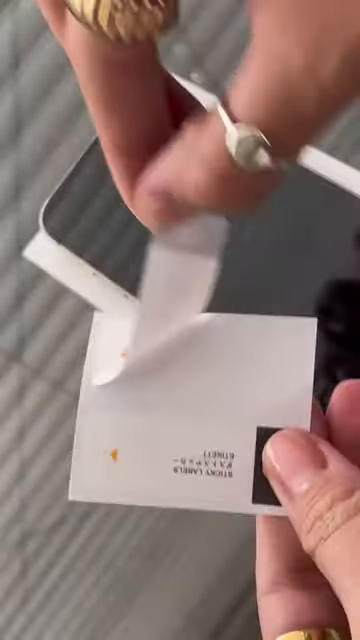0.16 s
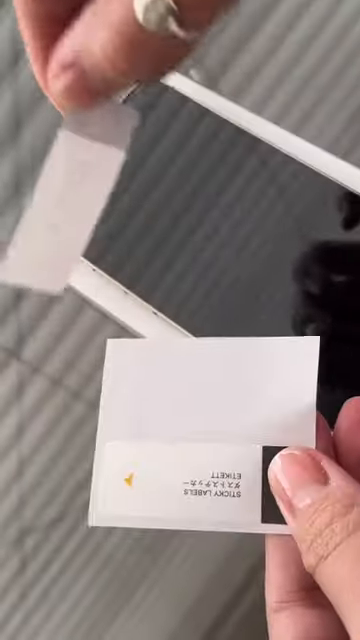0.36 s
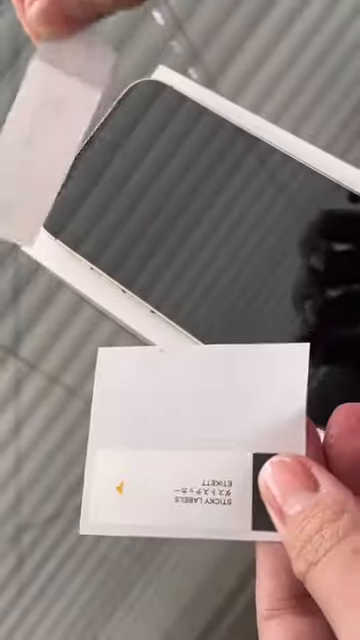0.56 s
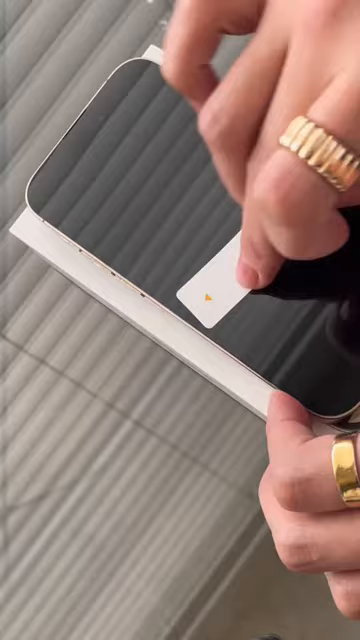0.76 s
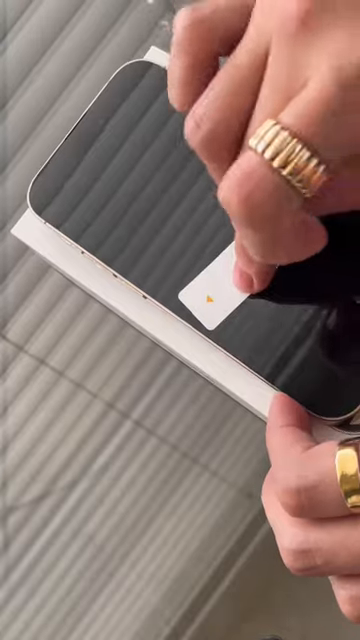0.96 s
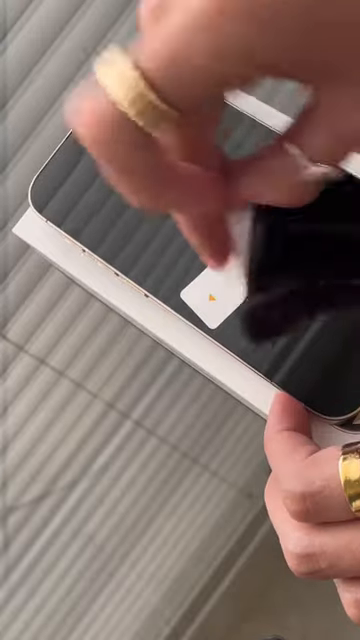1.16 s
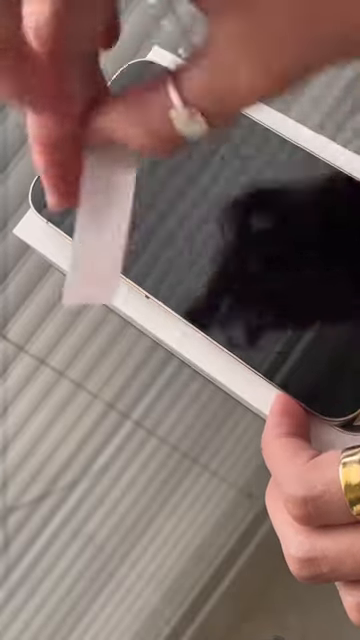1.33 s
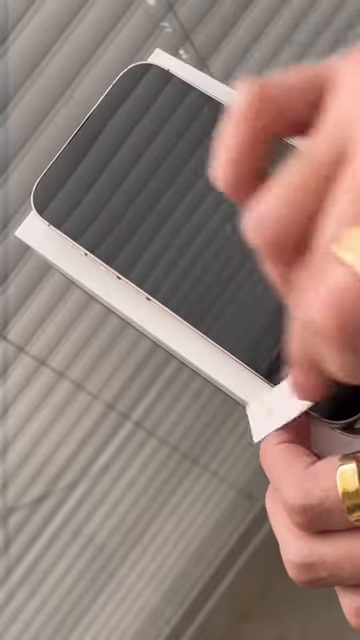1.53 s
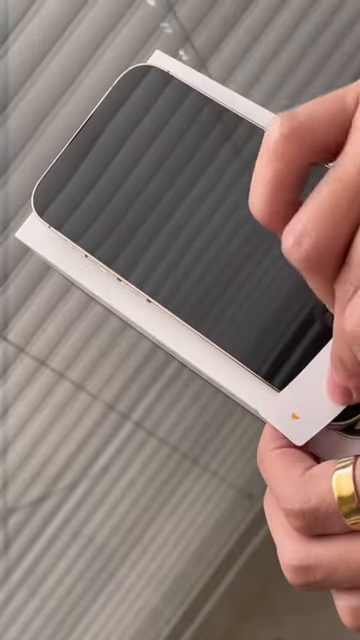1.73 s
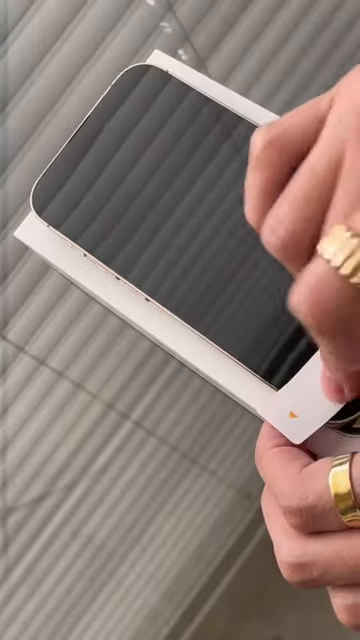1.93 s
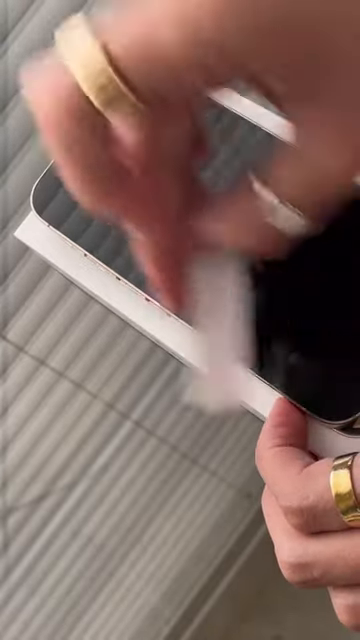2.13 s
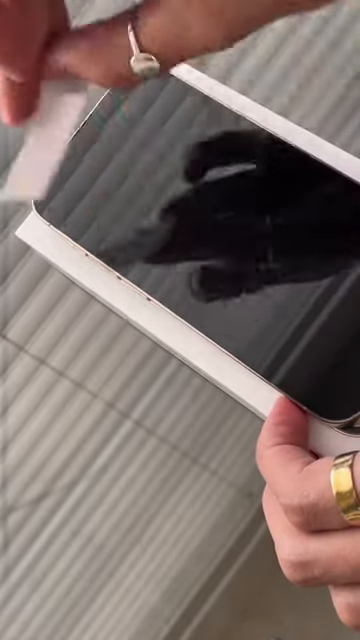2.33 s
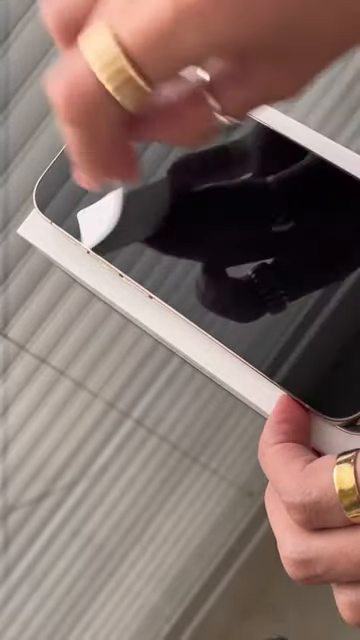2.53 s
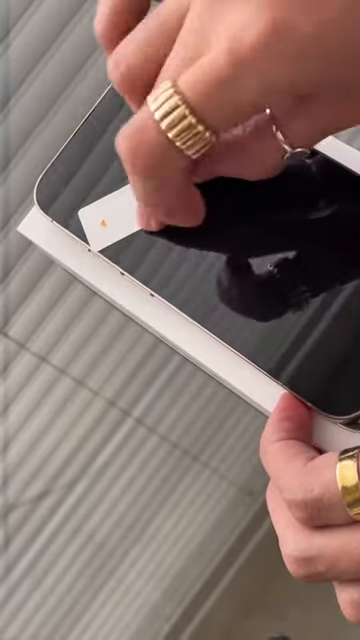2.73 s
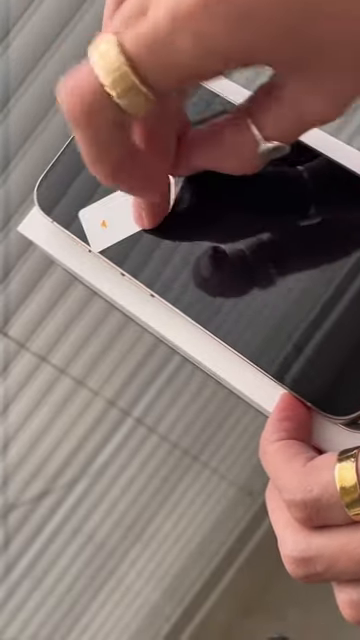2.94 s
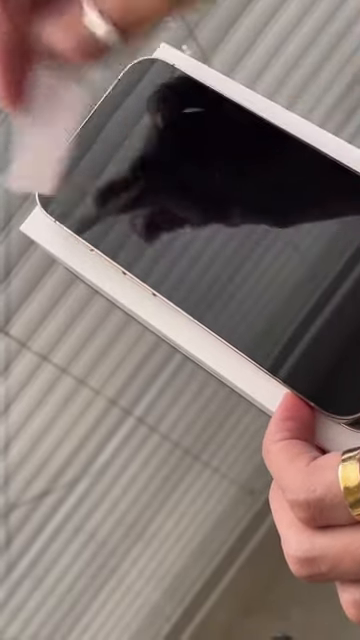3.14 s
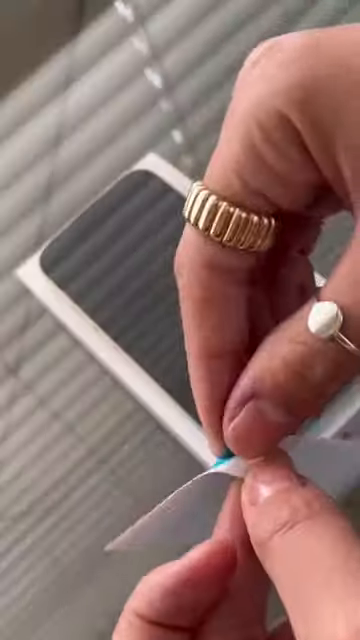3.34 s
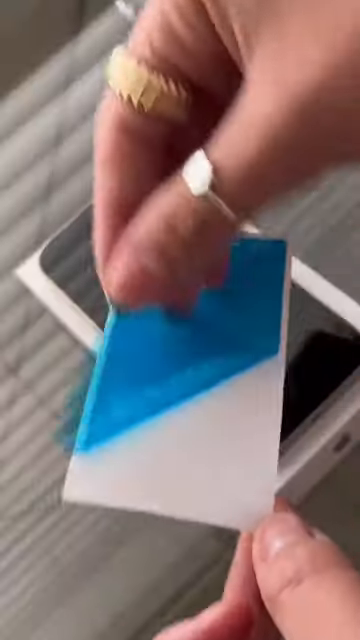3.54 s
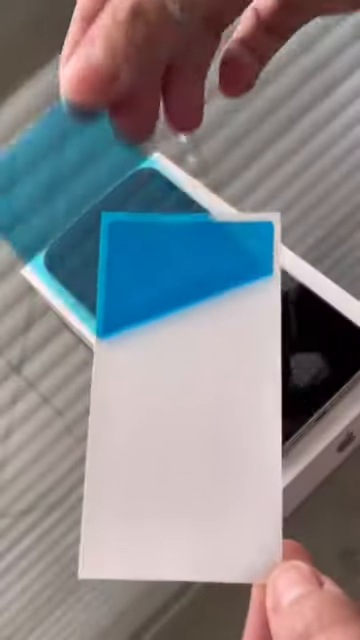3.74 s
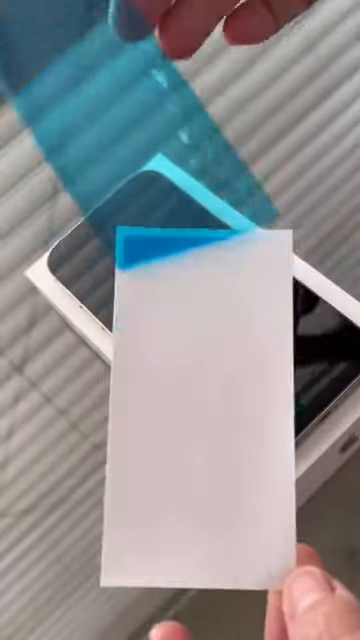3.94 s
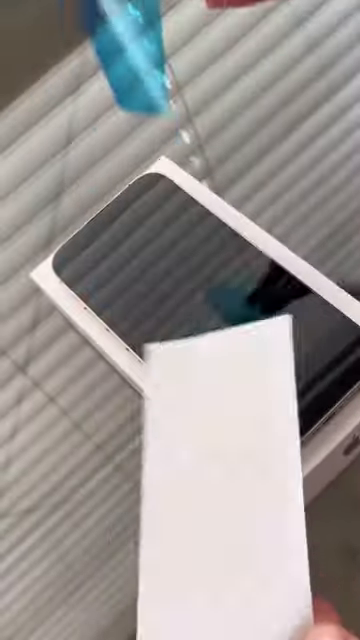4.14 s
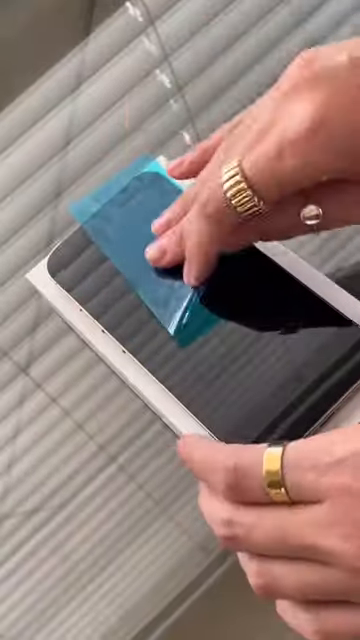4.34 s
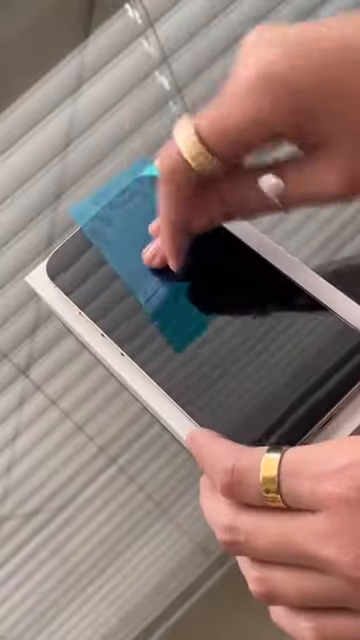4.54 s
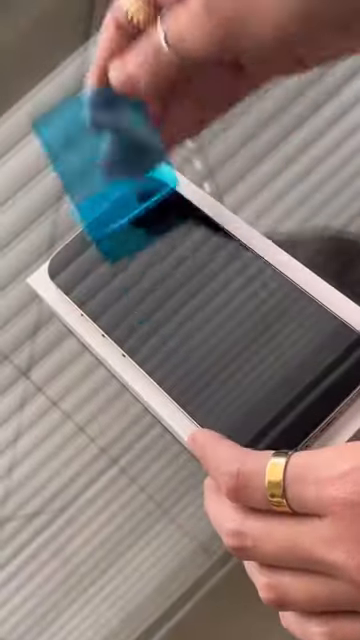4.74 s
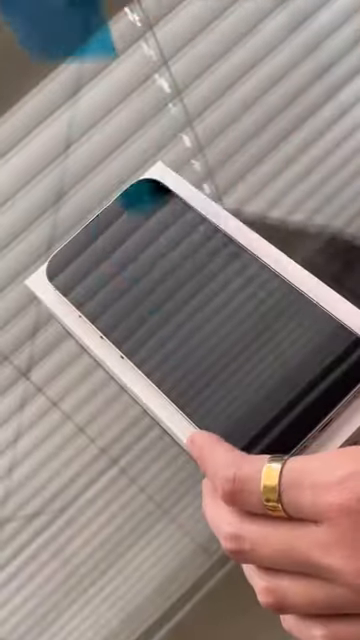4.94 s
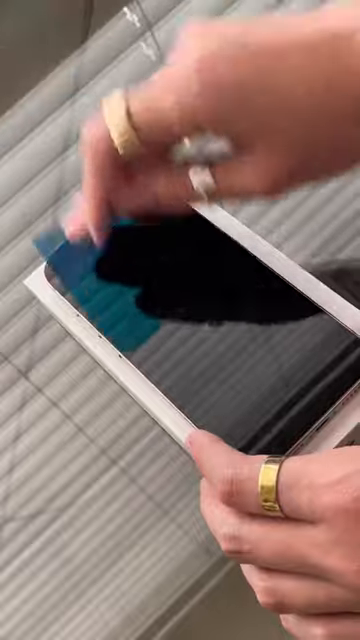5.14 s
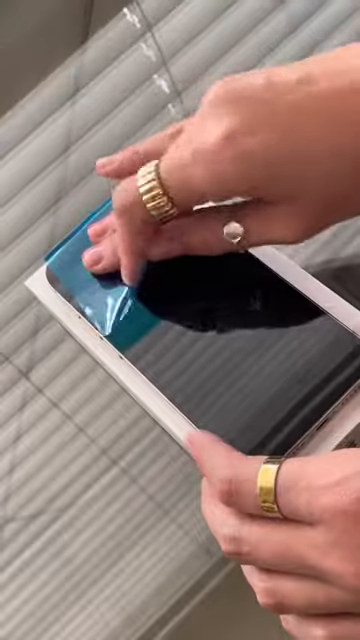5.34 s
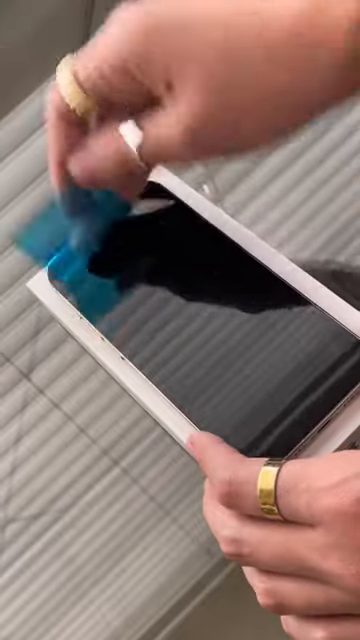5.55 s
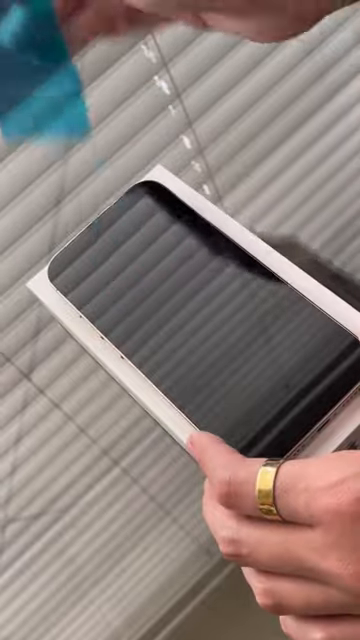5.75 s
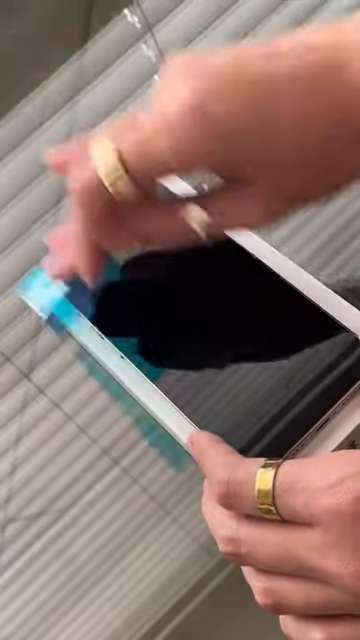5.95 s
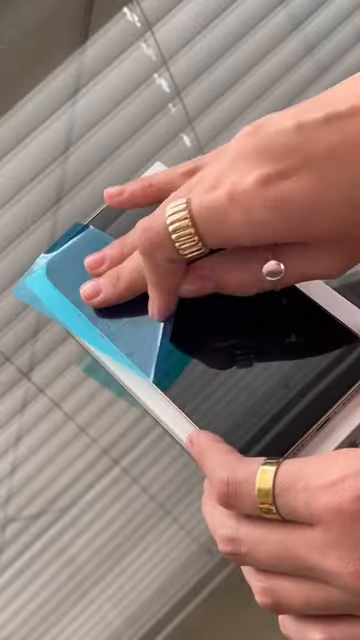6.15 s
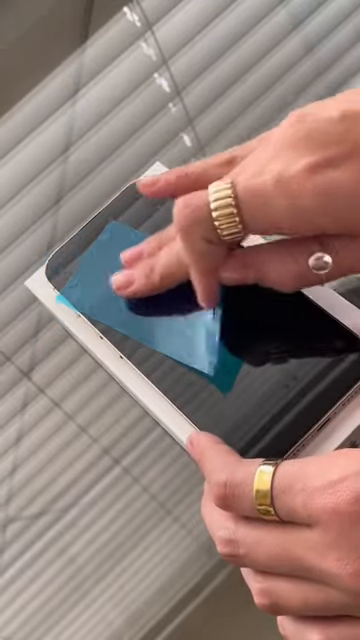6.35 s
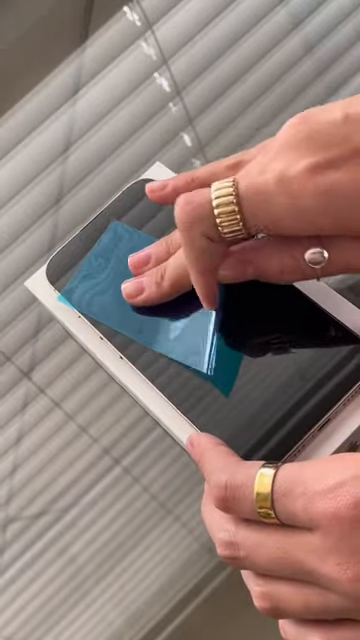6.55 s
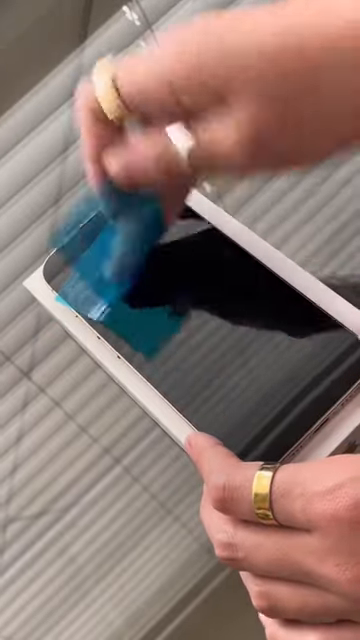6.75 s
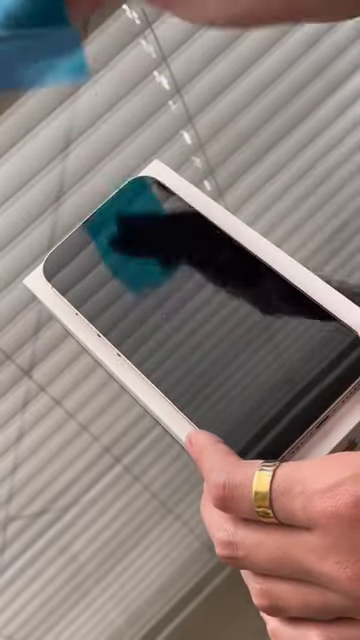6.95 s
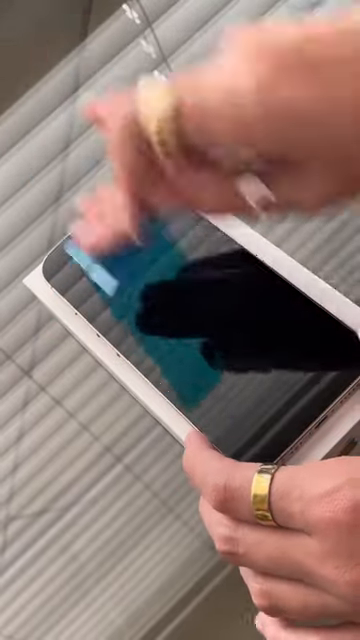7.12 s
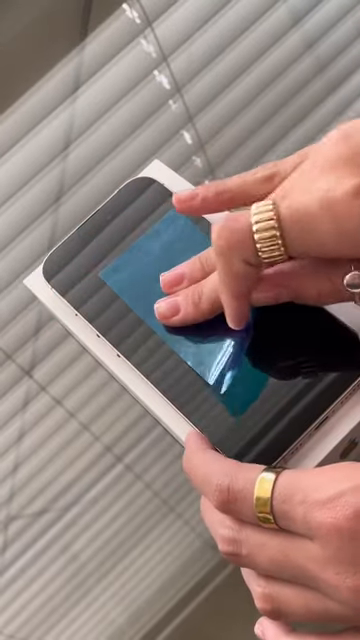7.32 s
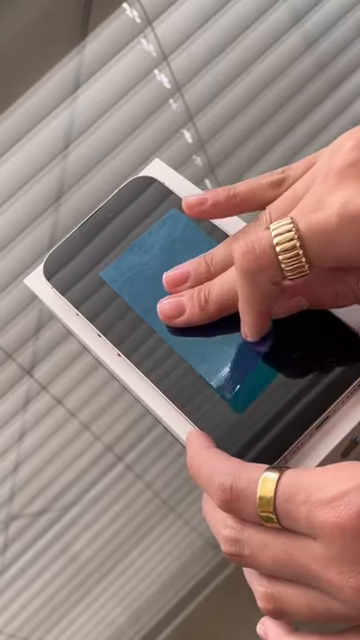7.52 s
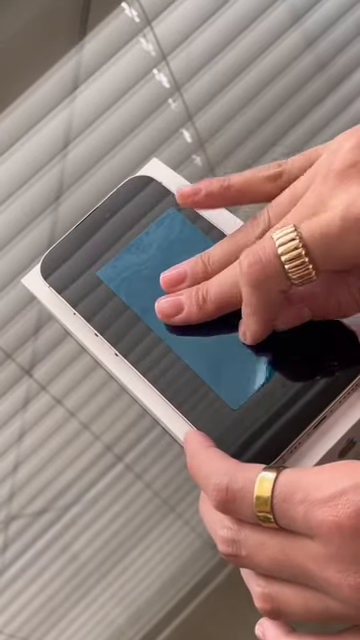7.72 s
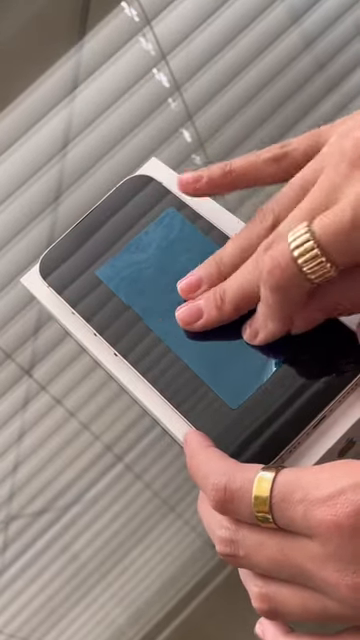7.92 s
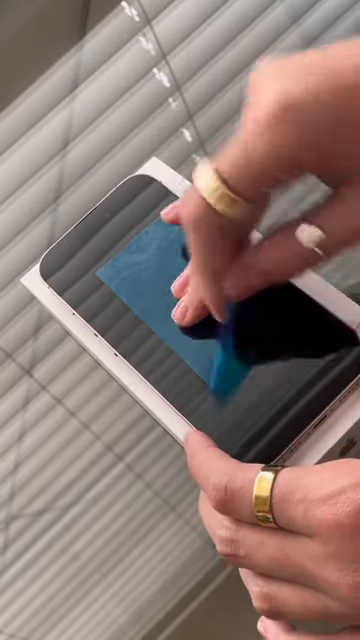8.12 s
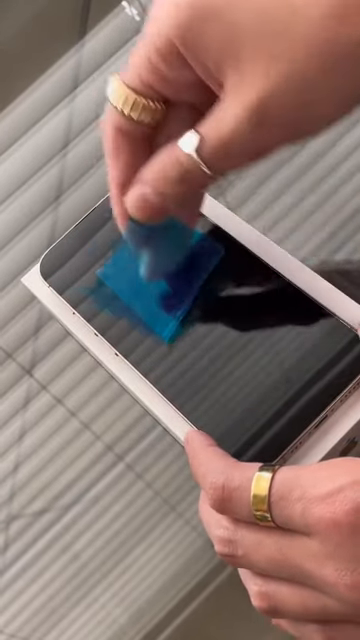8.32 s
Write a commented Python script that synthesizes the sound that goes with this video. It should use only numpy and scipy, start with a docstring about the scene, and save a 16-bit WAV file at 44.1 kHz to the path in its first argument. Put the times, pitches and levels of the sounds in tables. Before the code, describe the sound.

Sticky tabs and thin adhesive film peel off phone glass in sharp, crackling snaps, with faint sliding hiss between and low ventilation rumble in a small room.

```python
"""Peeling sticky film off glass

Sticky dust tabs and a sheet of blue adhesive film are pressed on a phone's glass and peeled off, close by.
The glue lets go in sharp snaps, each a click with a short noisy rattle, coloured by resonances.
Between them the film slides and hisses: lumpy noise that swells and dies with each movement.
A small furnished room answers with short noise tails, and low shaped noise makes its ventilation rumble."""
import sys
import numpy as np
from scipy import signal
from scipy.fft import rfft, irfft, next_fast_len
from scipy.io import wavfile
from scipy.ndimage import uniform_filter1d, map_coordinates

SR = 44100
rng = np.random.default_rng(int(sys.argv[2]) if len(sys.argv) > 2 else 0)


def log_audio(samples):
    """Write samples as a 16-bit WAV file to the path given in sys.argv[1]."""
    # one column per channel
    frames = np.atleast_2d(samples).T
    # limit to full scale, then quantise
    limited = np.clip(frames, -1, 1)
    pcm = np.round(limited * 32767).astype(np.int16)
    wavfile.write(sys.argv[1], SR, pcm)


N = 369558  # length in samples

# Glue letting go. Each row: time in seconds, relative strength in dB, film pitch in Hz,
# relative strength of the rattle in dB.
GLUE_SNAPS = [(0.201, -38.5, 3400, -26), (0.214, -38, 2900, -23), (0.2275, -40.5, 3330, -11),
              (0.244, -32, 4840, -12.5), (0.296, -49, 4000, -15), (0.749, -44, 4730, -11.5),
              (1.1009, -30, 5930, -8.5), (1.124, -21, 7200, -10), (1.1388, -13, 5730, -16),
              (1.1458, -23, 5400, -12), (1.154, -12, 6200, -16), (1.1615, -16, 5800, -7.5),
              (1.1697, -4, 6340, -23.5), (1.189, -14, 5950, -16.5), (1.476, -50.5, 4000, -16.5),
              (1.9971, -19, 5900, -6), (2.0067, -17, 6000, -10), (2.0169, -14.5, 7000, -5),
              (2.0265, -10.5, 6500, -8), (2.0351, -13.5, 5900, -14), (2.0512, -13, 5930, -11),
              (2.066, -28, 5640, -10), (2.084, -26, 5140, -9), (2.4979, -29.5, 5360, -9),
              (2.5486, -27, 2900, -16.5), (2.6533, -41, 5500, -15.5), (3.0348, -21.5, 4000, -15.5),
              (3.043, -20, 3500, -24), (3.0572, -17, 5050, -11.5), (3.069, -19, 4270, -8.5),
              (3.0793, -11.5, 4800, -16), (3.0951, -18.5, 5100, -10.5), (3.470, -43, 2460, -14),
              (3.6338, -35, 4600, -8.5), (3.6537, -8, 4840, -22), (4.0114, -26, 4150, -11.5),
              (4.0739, -44, 3100, -13), (4.2414, -32.5, 5670, -17), (4.5395, -9.5, 5000, -15.5),
              (4.5733, -14.5, 4300, -5), (4.5879, -16.5, 5400, -8.5), (4.6069, -6.5, 3230, -12.5),
              (4.6614, -6.5, 3370, -13), (4.6963, -0.5, 4060, -22), (4.771, -11, 4740, -23),
              (4.7744, -9.5, 4560, -10.5), (4.7968, -21, 3900, -7), (4.8172, -23.5, 4680, -16),
              (4.8237, -5.5, 4930, -19), (5.1418, -31, 3000, -2.5), (5.154, -23.5, 3260, -11.5),
              (5.345, -51, 4800, -14), (5.385, -50.5, 4000, -11.5), (5.4206, -6.5, 3900, -19),
              (5.446, -2.5, 5100, -19.5), (5.4796, -4.5, 6070, -18), (5.4989, -4.5, 5800, -16),
              (5.5136, -12, 5160, -17), (5.5311, -5.5, 5000, -13.5), (5.5563, -3, 4700, -26),
              (5.5632, -11, 4600, -13), (5.585, -4.5, 4030, -16.5), (5.602, -16, 5150, -8),
              (5.78, -50, 5000, -13), (5.9392, -11, 2620, -14), (5.9683, -26.5, 4630, -12),
              (5.985, -30, 3760, -9), (6.0282, -24.5, 5800, -12), (6.071, -38.5, 6500, -13),
              (6.12, -42, 3200, -13), (6.145, -22.5, 6300, -15.5), (6.1789, -24, 4970, -7.5),
              (6.1918, -32, 4500, -12), (6.212, -24.5, 4600, -13), (6.2173, -25.5, 5400, -8),
              (6.3456, -40, 3500, -13), (6.3883, -26.5, 5730, -12.5), (6.56, -47.5, 6070, -16),
              (6.6783, -15.5, 6500, -6), (6.718, -4.5, 5400, -9.5), (6.7255, -11.5, 4600, -10),
              (6.739, -13, 4130, -13), (6.7573, -16, 4520, -6.5), (6.7739, -29, 3800, -18),
              (6.7918, -6, 3730, -17), (6.8116, -19, 3980, -8), (6.819, -15.5, 4080, -17.5),
              (7.116, -49, 5000, -18), (7.151, -37, 3430, -11), (7.19, -37, 3660, -13),
              (7.208, -40, 5000, -18), (7.237, -37.5, 3200, -10), (7.506, -53, 5000, -15.5),
              (7.558, -48, 5450, -16), (7.647, -51.5, 4460, -15), (7.73, -13.5, 5130, -22.5),
              (8.019, -8.5, 5500, -15.5), (8.0562, -8, 4700, -10.5), (8.106, -9, 3240, -9),
              (8.151, -10, 3380, -13.5), (8.181, -10.5, 3300, -8), (8.2413, -1, 3720, -16.5),
              (8.2789, -4, 4400, -12), (8.3448, -3.5, 3650, -15.5), (8.378, -4, 4200, -15.5)]
# Movements of tab or film. Each row: moment of full strength in seconds, rise in seconds, hold in seconds,
# crackle level in dB, relative treble in dB, relative knock of the glass in dB.
MOVEMENTS = [(0, .01, 0.12, -73, -20, 11), (.19, 0.045, .06, -62, 7, 2.5), (0.741, 0.23, 0.03, -70.5, 5, 1),
             (1.146, 0.056, 0.019, -34, -3, -10), (1.478, 0.044, 0.0045, -67.5, -16, -10),
             (1.584, 0.069, 0.0031, -66.5, 4, -43), (1.999, 0.017, .05, -39, -7.5, -17.5),
             (2.509, .05, .04, -64.5, -10, -10), (2.649, 0.092, 0, -60, 0, -29.5),
             (3.043, 0.018, .04, -36.5, 0, -11), (3.434, 0.1, .2, -64.5, 0, -8.5),
             (3.64, 0.17, 0, -52, -23.5, 2), (3.72, 0.037, .26, -69, 4, -4.5), (4.04, .1, .06, -68, 1, 7),
             (4.189, 0.2, 0.0028, -52, -26, -6), (4.59, 0.097, 0, -43.5, 1.5, -8.5),
             (4.637, 0.038, .11, -59, -15, -9), (4.791, 0.045, 0, -43.5, -3.5, -9),
             (5.149, 0.034, 0.018, -54, -18.5, -3.5), (5.42, .08, 0.096, -60, -6, -15),
             (5.502, 0.051, .1, -38.5, -4.5, -9.5), (5.962, 0.051, .07, -52.5, -9, -2),
             (6.175, 0.036, 0.027, -40.5, -3, -14.5), (6.38, 0.14, 0, -60.5, -35.5, -6),
             (6.548, 0.048, .1, -72, 6, -31.5), (6.749, 0.055, 0.019, -22.5, -2.5, -5.5),
             (7.19, 0.16, .05, -67.5, -6.5, -6), (7.548, 0.17, .03, -73.5, -7.5, -22.5),
             (7.737, 0.066, 0.072, -65, 1.5, -17), (8.054, 0.12, .35, -56.5, -12, -10.5)]
# Colour of the crackle. Each row: frequency in Hz, relative level in dB per Hz.
CRACKLE_COLOUR = [(600, -8), (2300, -0.5), (6000, -3), (8000, -4.5), (13000, -7)]
# How fast the room dies away. Each row: frequency in Hz, time to fall by 60 dB in seconds.
ROOM_DECAY = [(500, 0.38), (12000, 0.17)]
# Room sound that differs between left and right. Each row: frequency in Hz, side level under mid in dB.
ROOM_SIDE = [(200, -37), (700, -16), (1290, -16.5), (2380, -38.5), (4400, -23.5), (15000, -17.5)]
# Colour of the ventilation. Each row: frequency in Hz, relative level in dB per Hz.
AIR_COLOUR = [(20, -16.5), (40, -4.5), (100, -4), (370, -11.5), (434, -15.5), (738, -22.5), (1910, -30),
              (2910, -46.5), (7310, -55.5), (16000, -68)]
# How alike the ventilation is left and right. Each row: frequency in Hz, likeness (1 is identical).
AIR_LIKENESS = [(100, .99999), (190, 1), (290, 1), (640, 0.66), (1410, 0.25), (2200, 1), (3100, 0.32),
                (7000, 0.45)]
# Room modes that the ventilation excites. Each row: frequency in Hz, width in Hz, boost in dB.
ROOM_MODES = [(74, 70, 8), (132, 21, 9.5), (249.3, 87, 8), (357.2, 40, 8)]
# Response of the microphone. Each row: frequency in Hz, gain in dB.
MIC_RESPONSE = [(8000, 1), (10200, -8.5), (11500, -0.5), (15600, 0.5), (15900, -18.5), (16500, -36)]

AIR_DB = -46  # ventilation level ahead of the microphone
TOP_HZ = 16700  # band limit
RISE_DB, FALL_DB_PER_S = 30, 369.5  # gain over a movement's rise; dying away after its hold
REST_DB = -86.5  # crackle of film at rest
SCATTER_DB = 2.5  # colour spread from snap to snap
# Share of a movement's colour, beyond the usual, that its crackle takes on
FOLLOWS, USUAL_TREBLE_DB, USUAL_KNOCK_DB = 0.22, -4.5, -8.5


def snaps():
    """Each release is one crack and a short lumpy rattle, coloured by the film, its edge and the glass."""
    s, strength_db, pitch, rattle_db = np.array(GLUE_SNAPS).T[..., None]
    own = colour_of(s[:, 0])  # a snap takes the colour of the movement it falls in
    treble_db, knock_db = (own + SCATTER_DB * rng.standard_normal(own.shape)).T[..., None]
    size, lead = 2048, 320  # samples in a snap, and how many come before its crack
    t = (np.arange(size) - lead) / SR
    hz = np.fft.rfftfreq(size, 1 / SR)
    chance = rng.standard_normal((len(s), 2, size))

    # a short faint noise fades in ahead of the crack; the rattle then dies in a fast and a slow part
    before = amp(60 * t / 0.0059) + amp(-16.5) * (1 + t * SR / lead) ** 2
    after = amp(-60 * t / 0.029) + amp(-20.5 - 60 * t / 0.11)
    fade = np.where(t > 0, after, before)
    lumps = amp(17.0 * uniform_filter1d(chance[:, 1], size=24, axis=1))  # smaller bonds follow unevenly
    noise = fade * lumps * chance[:, 0]
    even_out = np.linalg.norm(fade) / np.linalg.norm(noise, axis=1, keepdims=True)
    noise *= amp(rattle_db + 5.5) * even_out
    crack = -2.9 * (t == 0)  # a single sample

    film = resonance(hz, pitch, sharpness=0.71) + amp(-13.0) * resonance(hz, pitch, sharpness=6.5)
    edge = amp(treble_db) * resonance(hz, 13000, sharpness=0.79)
    knock = resonance(hz, 1300, sharpness=0.35) - amp(-0.5) * resonance(hz, 140, sharpness=0.46)
    colour = film - edge - amp(knock_db - 3.5) * knock

    # a close echo off the glass combs each snap differently
    echo_s = 0.000493 * amp(4 * chance[:, 1, :1])
    combed = colour * (1 - 0.6 * np.exp(-2j * np.pi * hz * echo_s))
    combed *= np.linalg.norm(colour, axis=1, keepdims=True) / np.linalg.norm(combed, axis=1, keepdims=True)

    rows = amp(strength_db - 6.5) * irfft(rfft(crack + noise) * combed)
    where = np.round(s * SR).astype(int) + np.arange(size)
    return np.bincount(where.ravel(), rows.ravel(), N + 2 * size)[lead:lead + N]


def crackle():
    """Countless tiny releases, heard as noise in clumps; the harder the peel, the lumpier."""
    steps = np.arange(0, N / SR + .001, .001)  # one a millisecond
    power_db = 10 * np.log10(moves(steps).sum(axis=0) + amp(REST_DB) ** 2)
    curves = (power_db, *colour_of(steps).T)
    level_db, treble_db, knock_db = (np.interp(np.arange(N) / SR, steps, c) for c in curves)
    effort = np.clip((level_db + 73.5) / 35, 0, 1)
    clumps = amp((1.5 + 1.6 * effort) * wobble(220) + (0.2 + 2.5 * effort) * wobble(45))

    def three_bands(hz):
        """The crackle's colour, split into body, middle and top."""
        low = 1 / (1 + (hz / 3000) ** 4)
        high = 1 / (1 + (9500 / (hz + 1)) ** 8)
        return amp(along(CRACKLE_COLOUR, hz)) * hz / (hz + 300) * [low, 1 - low - high, high]

    body, middle, top = unit(filtered(clumps * rng.standard_normal(N), three_bands)) / np.sqrt(3)
    body_gain = amp(FOLLOWS * (knock_db - USUAL_KNOCK_DB))
    top_gain = amp(FOLLOWS * (treble_db - USUAL_TREBLE_DB))
    return amp(level_db) * (body_gain * body + middle + top_gain * top)


def moves(t):
    """Crackle power of every movement at times t: rise, hold, fall."""
    s, rise, hold, db = np.array(MOVEMENTS).T[:4, :, None]
    rising_db = np.minimum(RISE_DB * (t - s) / np.maximum(rise, .003), 0)
    falling_db = FALL_DB_PER_S * np.maximum(t - s - np.abs(hold), 0)
    return amp(np.maximum(db + rising_db - falling_db, -300)) ** 2  # the floor keeps power above zero


def colour_of(t):
    """Treble and knock in dB at times t, averaged over the movements by their power."""
    power = moves(t)
    return (power / power.sum(axis=0)).T @ np.array(MOVEMENTS)[:, 4:]


def room(x):
    """Direct sound, table and room in the middle; treble, a wall echo and room make left and right differ."""
    late = lambda s: np.pad(x, (round(s * SR), 0))[:N]
    table = 0.047 * late(0.0021)  # the table top sends one early copy
    mid = x + table + amp(-15.0) * reverb(x, .004)
    wall = filtered(late(0.022), lambda hz: resonance(hz, 5500, sharpness=1.3))  # a side wall's echo
    # the top treble reaches the ports unequally: a quarter turn of phase in the side
    askew = filtered(x, lambda hz: 1j / (1 + (11600 / (hz + 1)) ** 20))
    diffuse = filtered(reverb(x, .002), lambda hz: amp(along(ROOM_SIDE, hz)))
    side = amp(-24.5) * wall + amp(-9.0) * askew + diffuse
    return np.array([mid + side, mid - side])


def reverb(x, delay, count=4):
    """The room's answer: slices of 35 ms take turns among a few noise tails, so echoes vary."""
    turn = (np.arange(N) // round(.035 * SR)) % count
    return sum(signal.fftconvolve(x * (turn == k), tail(ROOM_DECAY, delay))[:N] for k in range(count))


def tail(t60s, delay):
    """Noise whose every frequency dies at its own speed, with energy 1, after a delay in seconds."""
    hz, t, z = signal.stft(rng.standard_normal(SR // 2), SR, nperseg=128)
    h = signal.istft(z * amp(-60 * t / along(t60s, hz)[:, None]), SR, nperseg=128)[1]
    return np.pad(h / np.linalg.norm(h), (round(delay * SR), 0))


def ventilation():
    """Low rumble from shaped noise, almost the same left and right in the bass, with gentle patches."""
    z = signal.stft(rng.standard_normal((2, N)), nperseg=1024)[2]
    patches = uniform_filter1d(rng.standard_normal(z.shape[1:]), size=3, axis=0)  # smooth over frequency
    patches = uniform_filter1d(patches, size=5, axis=1)  # smooth over time
    pair = signal.istft(z * amp(1.7 * unit(patches)), nperseg=1024)[1][:, :N]

    def mid_and_side(hz):
        """Colour of the two noises; the likeness sets how they share the power."""
        drone_db = sum(db * np.exp(-(2 * (hz - c) / w) ** 2) for c, w, db in ROOM_MODES)
        angle = np.arccos(np.clip(along(AIR_LIKENESS, hz), -1, 1)) / 2
        return amp(along(AIR_COLOUR, hz) + drone_db) * [np.cos(angle), np.sin(angle)]

    mid, side = filtered(pair, mid_and_side)
    return amp(AIR_DB) * unit(np.array([mid + side, mid - side]))


def amp(db):
    """Decibels to gain."""
    return 10 ** (np.asarray(db) / 20)


def unit(x):
    """Scale x to an average (rms) level of 1."""
    return x / np.sqrt(np.mean(x ** 2) + 1e-20)


def along(points, hz):
    """Read a curve of (Hz, value) points at hz, with straight lines on a log frequency axis."""
    f, v = np.transpose(points)
    return np.interp(np.log(hz + 1), np.log(f + 1), v)


def wobble(rate):
    """A smooth random curve through `rate` random points a second."""
    return map_coordinates(rng.standard_normal(int(N * rate / SR) + 4), [np.arange(N) * rate / SR])


def filtered(x, response):
    """Shape x by a response that depends on frequency."""
    m = next_fast_len(N + SR // 2)  # spare room at the end
    return irfft(rfft(x, m) * response(np.fft.rfftfreq(m, 1 / SR)), m)[..., :N]


def resonance(hz, centre_hz, sharpness):
    """A resonance that rings only after it is struck, applied twice for steep flanks, with unit energy."""
    width = centre_hz / sharpness
    h = (1j * hz * width / (centre_hz ** 2 - hz ** 2 + 1j * hz * width)) ** 2
    return h / np.sqrt(np.mean(np.abs(h) ** 2, axis=-1, keepdims=True))


def scene():
    """Film and glue in the room, over the ventilation."""
    return room(snaps() + crackle()) + ventilation()


def record(dry):
    """The microphone rounds off the sharpest peaks, dips in the treble and keeps nothing above its limit."""
    rounded = dry / (1 + np.abs(dry / .9) ** 4) ** (1 / 4)
    return filtered(rounded, lambda hz: amp(along(MIC_RESPONSE, hz)) * np.clip((TOP_HZ - hz) / 150, 0, 1))


dry = scene()
out = record(dry)
log_audio(out)
```